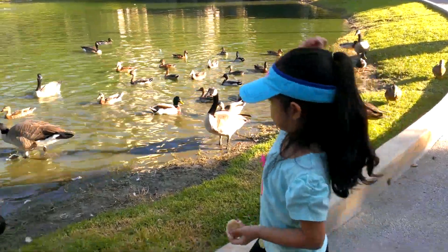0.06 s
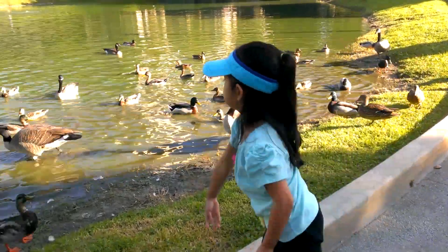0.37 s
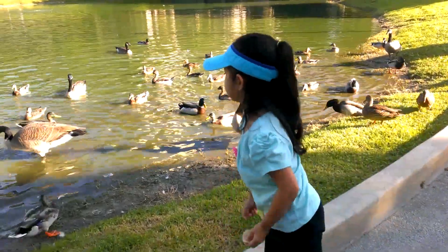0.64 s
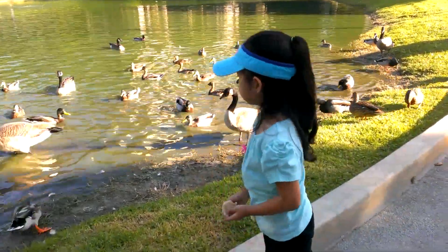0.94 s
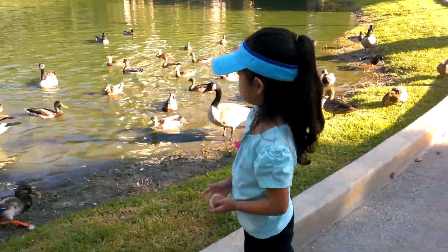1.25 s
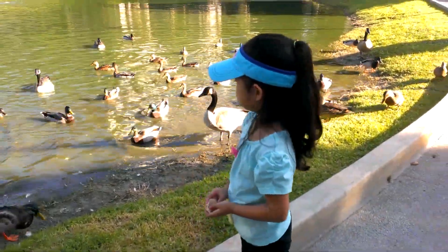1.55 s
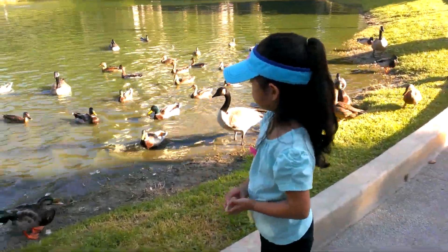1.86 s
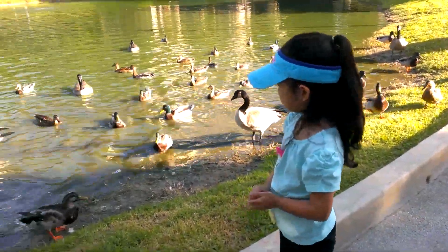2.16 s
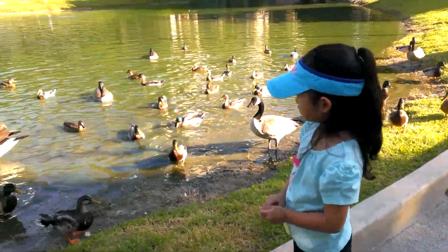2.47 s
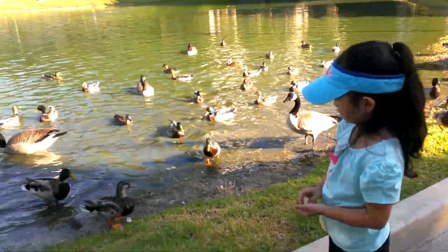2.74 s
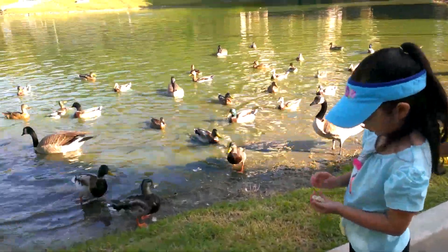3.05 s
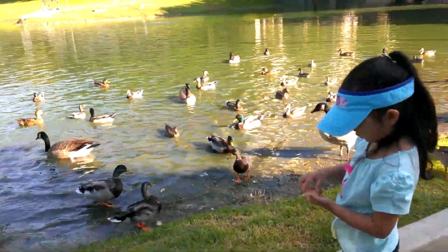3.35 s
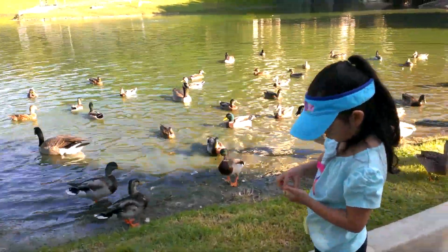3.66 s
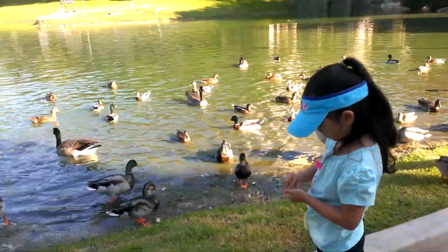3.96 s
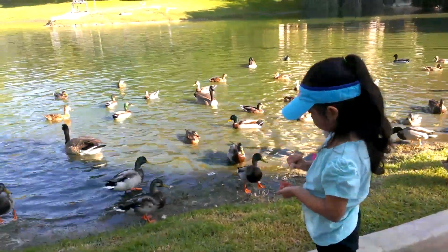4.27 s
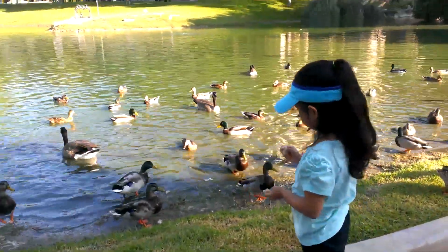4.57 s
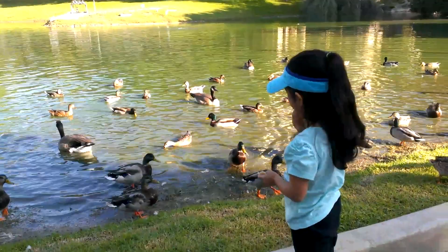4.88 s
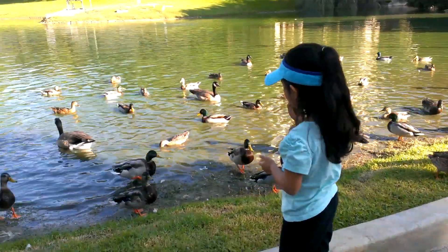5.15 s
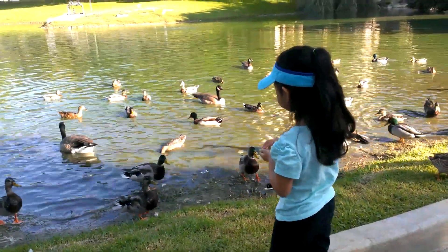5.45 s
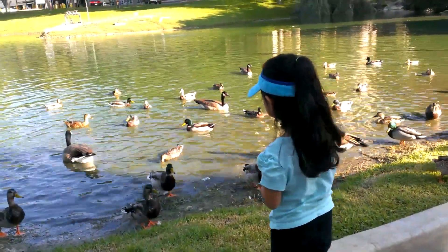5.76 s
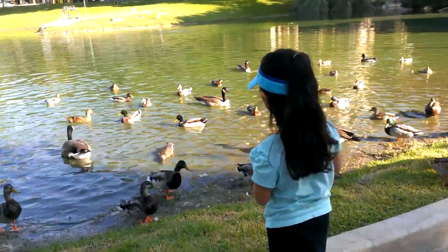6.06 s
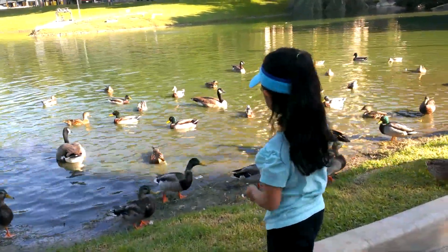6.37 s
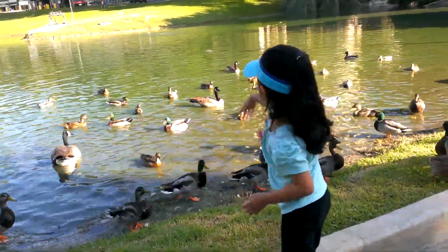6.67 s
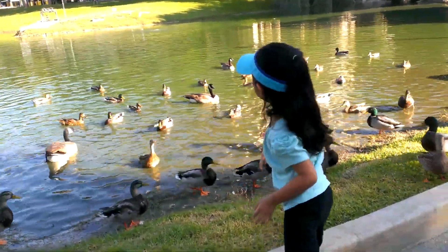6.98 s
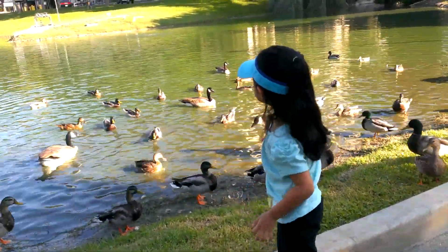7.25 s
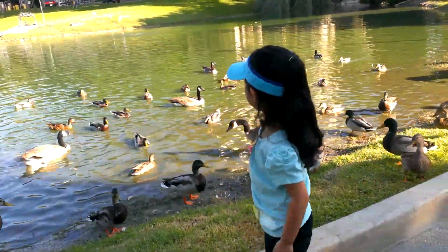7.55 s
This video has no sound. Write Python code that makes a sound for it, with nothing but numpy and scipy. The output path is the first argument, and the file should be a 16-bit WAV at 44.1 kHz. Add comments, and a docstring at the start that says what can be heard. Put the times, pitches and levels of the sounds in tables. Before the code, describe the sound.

A flock of ducks is heard in stereo from the bank of a park pond, over gentle lapping and a low hum of distant traffic. It opens with a brief wind rumble, small splashes, a plop and soft rattling clucks. From about 1.9 to 3.4 seconds a close duck, slightly right, gives short hoarse quacks among more clucks and thin peeps. Farther out a goose honks faintly at 1.3 seconds, then clearly and nasally at 2.7, 3.5 and 4.3. Wind gusts thump on the microphone from 1.4 seconds, mostly on the right, heaviest between 3.5 and 6.5. Small birds chirp faintly around 1.3, 5.6 and 6.2 seconds, and light splashes and drips recur. The close quacks return at 5 seconds and are busiest from 5.8 to 7, with a whistling edge and louder clucks. At the end a soft rushing wash swells and a far motor whines faintly, sinking in pitch.

```python
"""A park pond, from the bank, where a flock of ducks is being fed. Close to the stereo microphone a hen
quacks hoarsely; others cluck in quick rattles, thin peeps arch in between and small birds chirp. Farther
out one bird gives three nasal calls after a faint first one. Quacks, clucks and calls are pulses of the
syrinx ringing in the throat. Water laps, splashes and plops. Wind buffets the microphone, mostly on the
right, over distant traffic and a mid-range wash that swells at the end, where a far motor whines."""
import sys
import numpy as np
from scipy import signal
from scipy.fft import rfft, irfft, next_fast_len
from scipy.io import wavfile
from scipy.ndimage import uniform_filter1d, map_coordinates

SR = 44100
rng = np.random.default_rng(int(sys.argv[2]) if len(sys.argv) > 2 else 0)


def unload_audio(sound):
    """Save the sound as a 16-bit wav file, at the path given as the first command line argument."""
    columns = np.transpose(np.atleast_2d(sound))
    # keep every value between -1 and 1, then stretch to whole-number steps
    steps = np.round(np.clip(columns, -1, 1) * 32767)
    wavfile.write(sys.argv[1], SR, steps.astype(np.int16))


N = 340288
T = np.arange(SR // 3) / SR  # the time axis of one call
RUN_UP_S = .025  # the voice stirs just before its onset
CALL = T - RUN_UP_S  # seconds since the onset

# Wind on the microphone
GUST_HITS = [(1.434, 0.24, -24), (1.828, 0.16, -24.5), (2.715, 0.048, -26), (3, 0.054, -28.5),
             (3.19, 0.042, -23), (3.572, 0.076, -23), (3.692, 0.25, -26), (3.967, 0.057, -28),
             (4.179, 0.046, -21), (4.494, 0.17, -25), (4.716, 0.11, -26), (4.878, 0.18, -21.5),
             (5.126, 0.047, -24), (5.238, 0.3, -22.5), (5.572, 0.042, -25.5), (5.777, 0.15, -26.5),
             (6.035, 0.26, -23.5), (6.35, 0.058, -26), (6.52, 0.14, -30), (6.895, 0.059, -24.5),
             (7.157, 0.022, -24.5), (7.382, 0.032, -28), (7.679, 0.04, -26.5)]  # (time [s], length [s], relative level [dB])
BREEZE_LEVEL = [(0, -27), (0.6, -40.5), (1.3, -46.5), (2.2, -37), (3.4, -40), (4.4, -37.5), (6.6, -40),
                (7.72, -38.5)]  # between gusts: (time [s], relative level [dB])
WIND_PAN = [(0, -3), (2.2, -5), (4, -8), (6, -12.5), (7.5, -5.5)]  # (time [s], left over right [dB])
# Spectra of the steady sounds: (frequency [Hz], gain [dB])
RUMBLE_SPECTRUM = [(30, -32), (48, -6), (65, 0.5), (90, -2), (125, -17), (200, -28.5), (900, -95)]
FLUTTER_SPECTRUM = [(40, -31.5), (90, 2), (130, 5), (180, -4), (260, -7.5), (400, -30), (900, -64)]
TRAFFIC_SPECTRUM = [(40, -17.5), (100, 7), (250, 9), (420, 7.5), (650, 3.5), (1000, 3.5), (1300, -48),
                    (2500, -42), (6000, -49.5)]
WASH_SPECTRUM = [(600, -45.5), (1200, -3.5), (1800, 0), (2500, -6), (3300, -24), (5000, -51)]
LAPPING_SPECTRUM = [(1500, 2), (3200, -4.5), (5200, -5), (7000, -6.5), (10500, -11)]
ROAD_LEVEL = [(1, -51), (2.4, -47), (4.4, -47.5), (5.9, -45.5), (7.72, -50)]  # distant traffic: (time [s], level [dB])
POND_LEVELS = [(0, -55.5, -56.5), (0.9, -56, -64.5), (3.1, -54, -65), (4.8, -62, -66.5), (7.2, -56, -65.5),
               (7.6, -46, -62.5)]  # (time [s], mid-range wash level [dB], relative lapping level [dB])
# Clucks: (time [s], length [s], nominal pulse rate [Hz], roughness [ratio], relative level [dB],
# throat scale [Hz])
CLUCK_CALLS = [(0.06, 0.071, 156, 0.82, -44, 2290), (0.186, 0.049, 104, 0.77, -48.5, 1910),
               (0.272, 0.046, 97, 0.2, -46.5, 2120), (0.379, 0.053, 106, 1.17, -43.5, 2050),
               (0.822, .08, 160, 0.87, -53, 930), (0.935, .03, 180, 0.7, -51.5, 900),
               (1.095, 0.048, 177, 0.7, -52, 1710), (1.201, 0.028, 104, 1.1, -44, 2240),
               (1.223, 0.024, 168, 0.5, -29.5, 1875), (1.358, 0.062, 207, 0.17, -41, 1470),
               (1.476, 0.051, 260, 1.1, -47, 2140), (1.545, 0.0039, 68, 0.54, -26.5, 2140),
               (1.911, 0.058, 101, 1.1, -40.5, 2050), (1.989, 0.015, 216, 0.5, -30.5, 1830),
               (2.166, 0.034, 126, 0.65, -29, 1783), (2.306, 0.039, 115, 0.8, -47.5, 1650),
               (2.432, 0.027, 148, 0.4, -31, 1840), (2.458, 0.036, 124, 0.8, -36.5, 1450),
               (2.579, 0.0075, 205, 0.2, -34, 1890), (2.976, 0.092, 105, 0.88, -44, 1640),
               (3.106, 0.076, 183, 0.84, -36, 1760), (3.59, 0.058, 186, 0.6, -38, 1500),
               (3.687, 0.06, 99, 0.7, -41.5, 1920), (3.919, 0.054, 101, 0.4, -38, 2190),
               (4.007, 0.018, 200, 0.7, -40.5, 1470), (5.177, 0.055, 110, 0.54, -40.5, 1810),
               (6.173, 0.028, 450, 1, -41, 1660), (6.34, 0.063, 112, 0.56, -32.5, 1520),
               (6.522, 0.066, 116, 0.71, -36.5, 1980), (6.594, 0.051, 118, 0.08, -27, 1605),
               (6.859, 0.047, 149, 0.17, -28.5, 1570), (7.12, .04, 107, 0.77, -53.5, 1790),
               (7.338, 0.022, 220, 1.1, -45, 1230), (7.402, 0.045, 257, 0.54, -32, 1530),
               (7.49, 0.037, 87, 0.2, -42, 1820), (7.559, 0.045, 81, 0.1, -45, 1900)]
SPRAYS = [(0.062, -33.5), (0.088, -32.5), (0.178, -31.5), (1.427, -37.5), (1.549, -39.5), (3.474, -40),
          (4.723, -47), (6.191, -39.5), (7.315, -45), (7.383, -37), (7.643, -33.5)]  # at the bank: (time [s], relative level [dB])
BUBBLES = [(0.14, 566, -22.5), (0.592, 965, -32), (1.696, 1210, -33.5), (4.815, 975, -29.5)]  # plops and drips: (time [s], starting pitch [Hz], starting level [dB])
# The close hen: (time [s], length [s], mid pitch [Hz], body level [dB], throat scale [Hz],
# treble over body [dB], treble edge [Hz], nominal left over right [dB], nominal phase gap [rad])
QUACK_CALLS = [(.751, 0.031, 398, -39, 2250, -5.5, 6960, -7, 3.5),
               (1.865, 0.049, 290.6, -31.5, 1874, -20, 7350, -8, -2.5),
               (2.085, 0.07, 300.5, -38.5, 1985, -15, 7650, -7, -1),
               (2.378, 0.041, 303, -26.5, 1930, -14.5, 7400, -8, -2.4),
               (2.682, 0.038, 324.6, -27.5, 1930, -11.5, 6740, -4.5, -2.5),
               (3.018, 0.041, 309.3, -26, 2030, -16.5, 5650, -7, -3.5),
               (3.328, 0.04, 288, -25.5, 1876, -18, 5160, -4, 2.7),
               (5.08, 0.049, 299.3, -35.5, 1430, -12, 6700, -6, -2.3),
               (5.812, .11, 315, -33, 1427, -15, 6300, -5, 2),
               (6.085, .055, 306, -34.5, 1360, -13.5, 6900, -6, 1.5),
               (6.476, 0.04, 336.2, -30.5, 2010, -10.5, 5650, -11, -3.5),
               (6.788, 0.041, 325.5, -29.5, 1950, -13.5, 5700, -5, 3.1),
               (7.277, 0.028, 283.4, -45, 1350, -10, 4420, -7, 4.5),
               (7.599, 0.032, 287, -32, 1510, -20, 4400, -8, 1)]
# Throat resonances: (frequency [multiple of the throat scale], gain [dB])
CLUCK_TRACT = [(0.101, 1.5), (.2, -6.5), (.45, -4), (.7, 2), (0.952, 6.5), (1.202, 10), (1.4, -20),
               (1.648, -17), (2.201, -27.5), (3, -20.5), (5.499, -44)]
QUACK_TRACT = [(.16, -6.5), (.25, -9), (.4, -14.5), (.56, -21), (.74, -6), (.95, 9), (1.08, -1), (1.28, 1),
               (1.5, -16.5), (1.72, -10.5), (1.95, -45.5), (2.4, -77)]
GRUFF_TRACT = [(.1, -8.5), (.22, 2.5), (.33, -6), (.5, -23.5), (.72, 4), (1.05, -1), (1.3, -2), (1.6, -13),
               (2.1, -26), (3.2, -42.5)]
# Resonances of the hen's open bill and of the honking and peeping throats: (frequency [Hz], gain [dB])
OPEN_BILL = [(1500, -59.5), (3900, -10), (4350, -13), (4700, -3), (5050, -10), (5450, -5), (5950, -16),
             (6500, -10), (10500, -25.5)]
HONK_TRACT = [(300, -30), (630, -10.5), (950, -15), (1250, 1), (1450, 4.5), (1680, 9), (1880, 5),
              (2080, -12.5), (3200, -14.5), (4700, -23.5), (6400, -16.5), (8500, -32.5)]
PEEP_TRACT = [(1600, 7.5), (2100, -6.5), (2450, -15), (2900, -6)]
# How differently the two microphone ports hear the hen: (frequency [Hz], share of pan and phase [0-1])
PORT_SHARE = [(900, 0), (1500, 0.62), (2700, 0.69), (4000, 0.29)]
# The bird farther out: (time [s], length [s], top pitch [Hz], level [dB], starting roughness [ratio])
HONK_CALLS = [(1.288, 0.2, 710, -50.5, 0.06), (2.742, 0.18, 640, -34.5, 0.23), (3.483, 0.22, 625, -36, 0.1),
              (4.265, .22, 624, -36.5, 0)]
# Small birds: (time [s], length [s], start pitch [Hz], end pitch [Hz], level [dB], rasp [0-1])
CHIRP_CALLS = [(1.314, 0.12, 5080, 4870, -54, 1), (5.61, 0.028, 5230, 4260, -52.5, .6),
               (6.202, 0.042, 2870, 3850, -57.5, 0.16)]
# Thin peeps, and the whistling ring inside the hen's quacks:
# (time [s], length [s], top pitch [Hz], level [dB])
PEEPS_AND_RINGS = [(2.059, 0.066, 2520, -42.5), (2.102, 0.061, 1946, -32.5), (2.737, 0.027, 2410, -38),
                   (3.066, 0.032, 2154, -38), (3.836, 0.058, 2160, -46), (4.003, 0.039, 2670, -41.5),
                   (4.152, 0.05, 2680, -45), (4.481, 0.062, 2063, -47), (4.686, 0.051, 2340, -46),
                   (4.862, 0.05, 2465, -49), (5.261, 0.074, 2430, -53), (5.452, 0.071, 2813, -51),
                   (5.669, 0.06, 2330, -47), (5.834, 0.06, 2757, -39), (6.015, 0.049, 2360, -41.5),
                   (6.478, 0.0644, 2080, -27), (6.79, 0.051, 1965, -29.5), (6.761, 0.022, 2140, -40),
                   (6.79, 0.058, 1977, -29), (6.834, 0.028, 2260, -34), (6.971, 0.062, 2435, -48.5),
                   (7.424, 0.037, 2027, -32.5), (7.448, 0.043, 2440, -42.5), (7.561, 0.1, 2810, -48)]
MOTOR_GLIDE = [(6.5, 1015, -79), (7.0, 920, -68), (7.72, 822, -61.5)]  # a far motor: (time [s], pitch [Hz], level [dB])
BANK_DECAY = [(200, 0.36), (2000, 0.16), (9000, 0.48)]  # echo off the far banks: (frequency [Hz], time to fall 60 dB [s])


def amp(db):
    """Decibels to gain."""
    return 10 ** (np.asarray(db) / 20)


def unit(x):
    """x at rms 1."""
    return x / np.sqrt(np.mean(x ** 2) + 1e-20)


def along(points, hz):
    """(Hz, value) points joined on a log axis."""
    f, v = np.transpose(points)
    return np.interp(np.log(hz + 1e-6), np.log(f), v)


def curves(rows):
    """One value per sample for each column after the time."""
    s, *cols = np.transpose(rows)
    return [np.interp(np.arange(N) / SR, s, c) for c in cols]


def wobble(rate, size=len(T)):
    """A smooth random curve with rate knots a second."""
    return map_coordinates(rng.standard_normal(4096), [np.arange(size) * rate / SR], mode="wrap")


def colour(x, points, scale=1):
    """x through a minimum-phase filter of (Hz, dB) points, their frequencies multiplied by scale."""
    size = x.shape[-1]
    m = 2 * next_fast_len(size // 2 + SR // 10)
    cepstrum = irfft(np.log(amp(along(points, np.fft.rfftfreq(m, 1 / SR) / scale))))
    cepstrum[1:m // 2] *= 2
    cepstrum[m // 2 + 1:] = 0
    return irfft(rfft(x, m) * np.exp(rfft(cepstrum)), m)[..., :size]


def noise(points, alike):
    """Coloured stereo noise of rms 1; alike is the share that both channels have in common."""
    common, left, right = colour(rng.standard_normal((3, N)), points)
    return unit(np.sqrt(alike) * common + np.sqrt(1 - alike) * np.array([left, right]))


def patchy(x, depth_db):
    """x with its level wandering separately in each narrow band."""
    bands = signal.stft(x, nperseg=1024)[2]
    field = uniform_filter1d(rng.standard_normal(bands.shape[1:]), size=3, axis=0)
    field = unit(uniform_filter1d(field, size=6, axis=1))
    return unit(signal.istft(bands * amp(depth_db * field), nperseg=1024)[1][:, :N])


def sides(pan_db):
    """Left and right gains with a mean of 1; positive is to the left."""
    gains = amp([pan_db / 2, -pan_db / 2]).reshape(2, -1)
    return gains / gains.mean(axis=0)


def add(out, s, x, pan_db=0, lead=0):
    """Mix x in at time s; the left channel leads by lead seconds."""
    for channel, sound, start in zip(out, sides(pan_db) * x, (s - lead / 2, s + lead / 2)):
        part = channel[max(round(start * SR), 0):][:len(sound)]
        part += sound[:len(part)]


def swell(length, rise, fall):
    """The envelope of a call: it opens smoothly and dies away around its end."""
    gate = (1 + np.tanh(CALL / rise)) * (1 - np.tanh((CALL - length) / fall)) / 4
    return gate * (1 - np.exp(-(T / .0032) ** 2))


def arch(length, sag):
    """Relative pitch that rises to 1 in the middle of a call and sags at both ends."""
    return 1 - sag * np.minimum((2 * CALL / length - 1) ** 2, 1)


def at_level(x, length, db):
    """A call scaled to an rms level over its length."""
    return amp(db) * x / np.sqrt(np.sum(x ** 2) / (length * SR) + 1e-20)


def wind():
    """Gusts thump on the microphone ports over a light breeze, harder on the right; eddies flutter."""
    t = np.arange(N) / SR
    breeze_db, = curves(BREEZE_LEVEL)
    pan_db, = curves(WIND_PAN)
    attack_s, release_s = .0037, .013
    power = amp(breeze_db + 2 + 5 * wobble(20, N)) ** 2
    for s, length, db in GUST_HITS:
        gate = (1 + np.tanh((t - s) / attack_s)) * (1 - np.tanh((t - s - length) / release_s)) / 4
        power += gate * amp(db + 1) ** 2
    buffet_db = 10 * np.log10(power)
    rumble = noise(RUMBLE_SPECTRUM, alike=.68)
    # evened out, so that the gusts set its swells
    rumble /= np.sqrt(uniform_filter1d(np.mean(rumble ** 2, axis=0), size=3000) + .24)
    eddies = unit(amp(3.8 * wobble(45, N)))
    flutter = noise(FLUTTER_SPECTRUM, alike=.86) * eddies * amp(-39 + .95 * (buffet_db + 32))
    return (rumble * amp(buffet_db - 1.85) + flutter) * sides(pan_db)


def traffic(drift_db):
    """Distant traffic: a low, wavering hum, nearly the same in both channels."""
    level_db, = curves(ROAD_LEVEL)
    hum = patchy(noise(TRAFFIC_SPECTRUM, alike=.92), depth_db=3)
    return hum * amp(level_db + drift_db + 1.5 * wobble(22, N))


def pond():
    """Lapping water and a mid-range wash of noise that swells at the end, both wide and wavering."""
    wash_db, water_db = curves(POND_LEVELS)
    wash = patchy(noise(WASH_SPECTRUM, alike=.17), depth_db=4) * amp(wash_db + 2 * wobble(24, N))
    lapping = noise(LAPPING_SPECTRUM, alike=.3) * amp(water_db + 9 + 2.5 * wobble(30, N))
    return wash + lapping


def syrinx(pitch, rough, jitter, scatter_db):
    """Membranes snap shut once a cycle, unevenly, and let a puff of turbulent air through each time."""
    phase = np.cumsum(pitch * (1 + jitter * wobble(250))) / SR
    phase += .5 - phase[round(RUN_UP_S * SR)]
    pulses = np.diff(np.floor(phase), prepend=np.floor(phase[0])) * amp(scatter_db * wobble(398.5))
    air = rng.standard_normal(len(T)) * np.exp(-2.5 * (phase % 1))
    return np.sqrt(1 - rough) * unit(pulses - pulses.mean()) + np.sqrt(rough) * unit(air)


def bursts(rate, tone_hz, half_width_s=.0021):
    """A throat tone let through in one rounded burst per cycle, with near silence in between."""
    phase = np.cumsum(rate * (1 + .04 * wobble(120))) / SR
    phase -= phase[round(RUN_UP_S * SR)]
    offset = (phase % 1 - .5) / rate  # seconds from the middle of the nearest burst
    tone = np.sin(2 * np.pi * tone_hz * offset + wobble(153))
    window = np.exp(-(offset / half_width_s) ** 2) * np.sin(np.pi * (phase % 1))
    return unit(tone * window * amp(wobble(140)))


def clucks():
    """Short rattles: bursts of a sinking tone over a throat rasp; both trail off as the bill closes."""
    out = np.zeros((2, N))
    for s, length, rate, rough, db, throat_hz in CLUCK_CALLS:
        pitch = rate * (.03 + arch(length, sag=.1))
        progress = np.clip(CALL / length, 0, 1)
        envelope = swell(length, rise=.003 + .07 * length, fall=.004 + .18 * length)
        envelope *= amp(3 * np.sin(np.pi * progress) - 3 * progress)
        air = amp(-15) * rng.standard_normal(len(T)) * swell(length, rise=.008, fall=.018)
        source = syrinx(pitch, rough * .6, jitter=.05, scatter_db=3) * envelope + air
        rasp = colour(source * (1 - progress), CLUCK_TRACT, throat_hz * 1.122)
        rasp += colour(source * progress, CLUCK_TRACT, throat_hz * .984)
        tone_hz = throat_hz * 1.134 * (1 - .13 * np.clip(CALL / length, 0, 2))
        rattle = bursts(pitch, tone_hz) * envelope
        held = np.clip((length - .02) / .073, 0, 1)  # a held rattle is more tonal than a quick pop
        call = unit(rasp) + unit(rattle) * amp(9) * 2 * held * np.clip(1 - rough, 0, 1)
        add(out, s - RUN_UP_S, at_level(call, length, db + 2.5), pan_db=-2, lead=.00004)
    return out


def splashes(attack_s=.002, t60_s=.2):
    """Paddling feet and bills throw up sprays of fine drops at the bank."""
    out = np.zeros((2, N))
    for s, db in SPRAYS:
        drops = rng.standard_normal(len(T)) * amp(7.4 * wobble(460))
        spray = colour(drops, [(1000, -1.5), (3500, -9.5), (5300, -5.5), (7000, -9), (10500, -20.5)])
        envelope = amp(-60 * T / t60_s) * (1 - np.exp(-T / attack_s))
        add(out, s, unit(spray) * envelope * amp(db - 5))
    return out


def plops(attack_s=.00031, t60_s=.057):
    """Larger bubbles ring briefly with rising pitch."""
    out = np.zeros((2, N))
    for s, hz, db in BUBBLES:
        bubble = np.sin(2 * np.pi * hz * (T + 4.2 * T ** 2))
        add(out, s, bubble * amp(db - 60 * T / t60_s) * (1 - np.exp(-T / attack_s)))
    return out


def ports(x, pan_db, phase_gap):
    """A close call at the two microphone ports: above the low body they differ in level and phase."""
    share = along(PORT_SHARE, np.fft.rfftfreq(len(x), 1 / SR))
    turn = np.exp(.5j * phase_gap * share * np.array([[1], [-1]]))
    return irfft(rfft(x) * sides(pan_db * share) * turn, len(x))


def quacks():
    """The hen, close on the right: hoarse climbing calls over a clean chest tone; her open bill rings."""
    out = np.zeros((2, N))
    for s, length, mid_hz, db, throat_hz, treble_db, edge_hz, pan_db, phase_gap in QUACK_CALLS:
        opening = np.clip(CALL / length, 0, 1)  # the pitch climbs and the throat resonance sinks
        pitch = mid_hz * (.94 + .12 * opening) * arch(length, sag=.04)
        envelope = swell(length, rise=.0096, fall=.0096) * amp(2.9 * wobble(59))
        source = syrinx(pitch, rough=.2, jitter=.045, scatter_db=4) * envelope
        throat = QUACK_TRACT if throat_hz > 1700 else GRUFF_TRACT  # a low resonance is broader
        body = colour(source * (1 - opening), throat, throat_hz * 1.056)
        body += colour(source * opening, throat, throat_hz * 1.003)
        chest = np.sin(2 * np.pi * np.cumsum(pitch) / SR) * envelope
        bill = colour(source, OPEN_BILL)
        bill = colour(bill, [(1, -1.5), (1.1, -14)], edge_hz)  # shelved down above the treble edge
        call = at_level(body, length, db) + at_level(bill, length, db + treble_db)
        call += at_level(chest, length, min(db - 6.5, -34.5))
        add(out, s + .005 - RUN_UP_S, ports(call, pan_db, phase_gap))
    return out


def honks():
    """Farther out, nasal calls start clean, then sink and turn raspy as the cycles grow unequal."""
    out = np.zeros((2, N))
    for s, length, top_hz, db, rough in HONK_CALLS:
        broken = (1 + np.tanh((CALL - length * .62) / .0032)) / 2
        pitch = top_hz * np.interp(CALL / length, [0, .2, .34, .6, 1], [.76, .99, 1, .88, .86])
        clean = syrinx(pitch, rough * .6 + .06, jitter=.03, scatter_db=2)
        rasp = syrinx(pitch / 4, rough=.4, jitter=.05, scatter_db=3)
        source = (1 - .5 * broken) * clean + .55 * broken * rasp
        source *= swell(length * .87, rise=.014, fall=.058) * np.clip(CALL / .048 + .18, 0, 1)
        add(out, s - RUN_UP_S, at_level(colour(source, HONK_TRACT), length, db), lead=.00003)
    return out


def whistle(pitch, length, db, rasp):
    """A thin tone and its faint octave, shaped by the throat; rasp is the share that is air noise."""
    phase = 2 * np.pi * np.cumsum(pitch * (1 + .01 * wobble(300))) / SR
    grain = np.sqrt(1 - rasp) + np.sqrt(rasp / 2) * (wobble(700) + 1j * wobble(700))
    octave = amp(np.interp(pitch, [2100, 2400, 4500], [-30, -13, -40]))
    tone = np.real(grain * (np.exp(1j * phase) + octave * np.exp(2j * phase)))
    tone *= amp(along(PEEP_TRACT, pitch) + 2 * wobble(120))
    envelope = swell(length * 1.086, rise=.0046, fall=.002) * np.clip(CALL / .0059 + .5, 0, 1)
    return at_level(tone * envelope, length, db)


def chirps():
    """Small birds, faint and central: high whistles that glide one way."""
    out = np.zeros((2, N))
    for s, length, start_hz, end_hz, db, rasp in CHIRP_CALLS:
        glide = np.interp(CALL, [0, length], [start_hz, end_hz])
        add(out, s - RUN_UP_S, whistle(glide, length, db, rasp))
    return out


def peeps_and_rings():
    """Thin peeps, and the whistling ring inside the hen's quacks: arching tones well to the right."""
    out = np.zeros((2, N))
    for s, length, top_hz, db in PEEPS_AND_RINGS:
        sag = np.clip((top_hz - 1750) / 4400, .03, .18)  # higher tones leap further
        call = whistle(top_hz * arch(length, sag), length, db, rasp=.2)
        add(out, s - RUN_UP_S, call, pan_db=-12.5, lead=.00004)
    return out


def motor(drift_db):
    """One far motor comes out of the traffic at the end, its whine flickering and sinking in pitch."""
    hz, db = curves(MOTOR_GLIDE)
    flicker = unit(wobble(110, N) + 1j * wobble(110, N))
    return np.real(flicker * np.exp(2j * np.pi * np.cumsum(hz) / SR)) * amp(db + drift_db)


def banks(x, near_db, far_db):
    """Ground and water scatter a sound back at once; the far banks add a faint tail."""
    hz, t, bands = signal.stft(rng.standard_normal((2, len(T))), SR, nperseg=256)
    decay = amp(-60 * t / along(BANK_DECAY, hz)[:, None])
    tail = signal.istft(bands * decay, SR, nperseg=256)[1][:, :len(T)]
    tail *= 1 - np.exp(-T / .03)
    scatter = rng.standard_normal((2, len(T))) * amp(-60 * T / .02) * (1 - np.exp(-T / .0018))
    near = amp(near_db) * scatter / np.linalg.norm(scatter[0])
    far = amp(far_db) * tail / np.linalg.norm(tail[0])
    return signal.fftconvolve(x, near + far, axes=1)[:, :N]


def scene():
    """The pond under the wind; the voices reach the microphone more directly than the splashes."""
    voices = quacks() + clucks() + honks() + peeps_and_rings() + chirps()
    water = splashes() + plops()
    echoes = banks(voices, near_db=-6, far_db=-9) + banks(water, near_db=-5.5, far_db=-7.5)
    foreground = voices + water + echoes + wind()
    drift_db = 1.5 * wobble(9, N)  # traffic and motor swell and fade together
    return foreground + traffic(drift_db) + pond() + motor(drift_db)


def record(dry):
    """Nothing sounds above 10.7 kHz."""
    top_hz = 10700
    m = next_fast_len(N + SR // 2)
    return irfft(rfft(dry, m) * (np.fft.rfftfreq(m, 1 / SR) < top_hz), m)[:, :N]


dry = scene()
out = record(dry)
unload_audio(out)
```